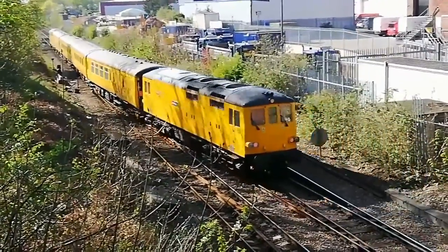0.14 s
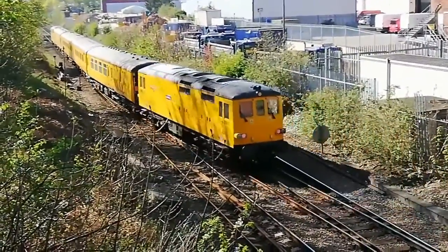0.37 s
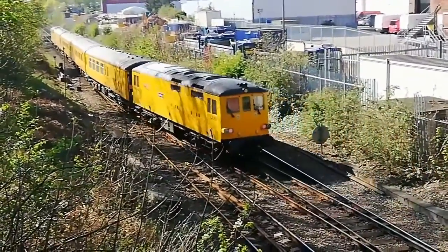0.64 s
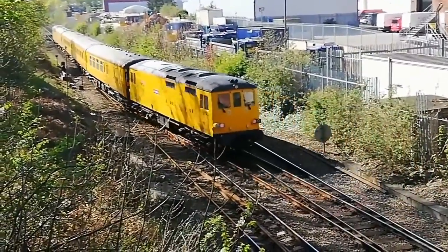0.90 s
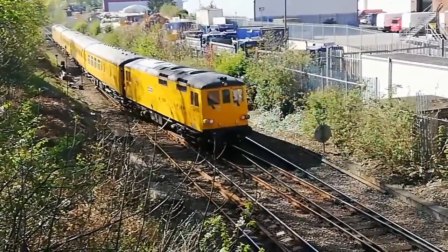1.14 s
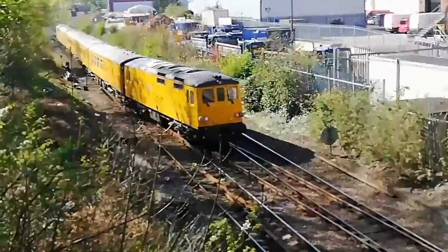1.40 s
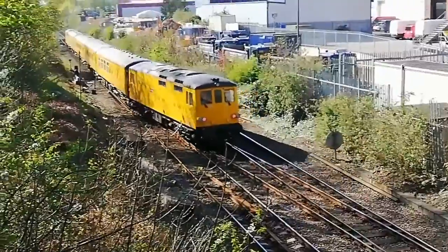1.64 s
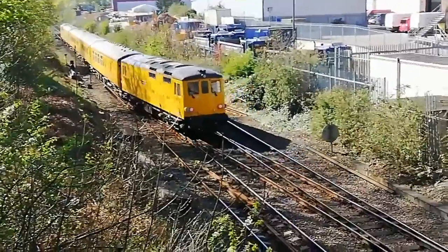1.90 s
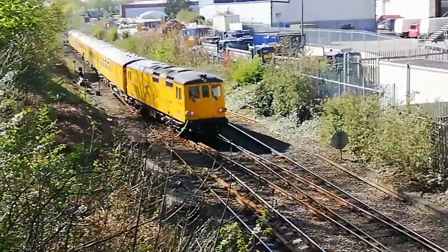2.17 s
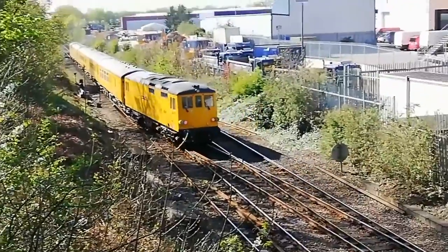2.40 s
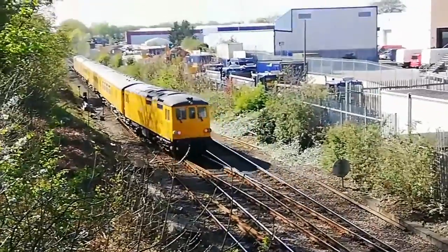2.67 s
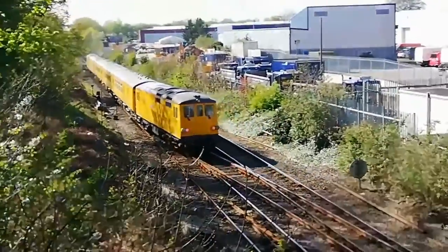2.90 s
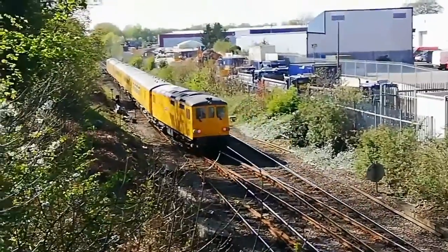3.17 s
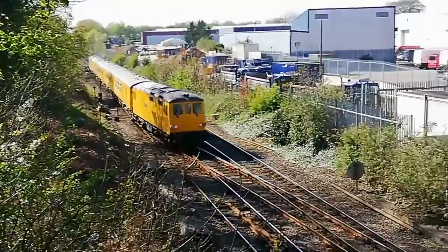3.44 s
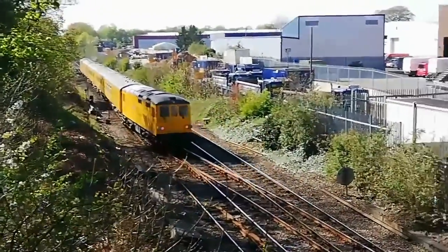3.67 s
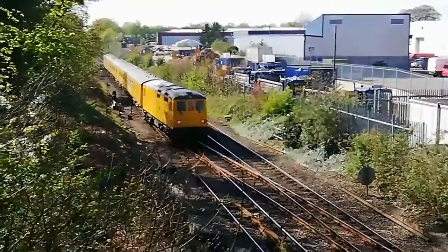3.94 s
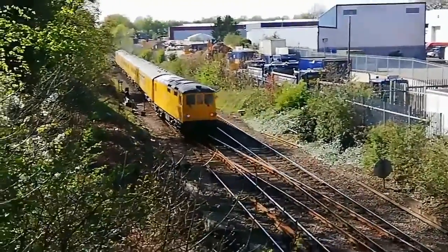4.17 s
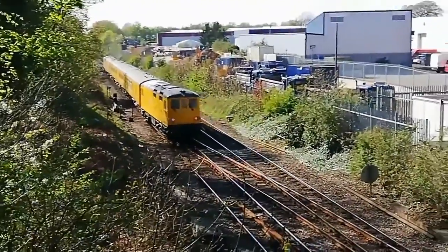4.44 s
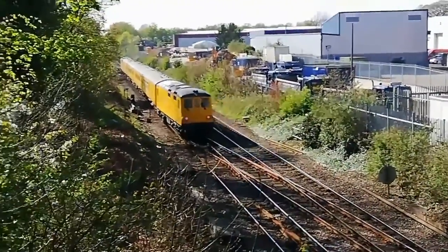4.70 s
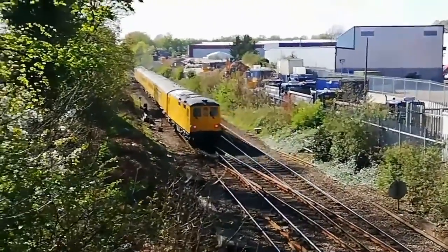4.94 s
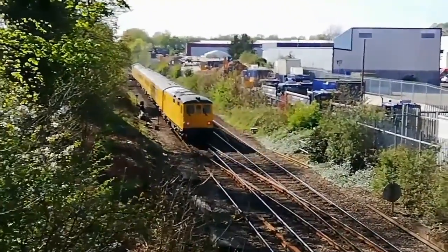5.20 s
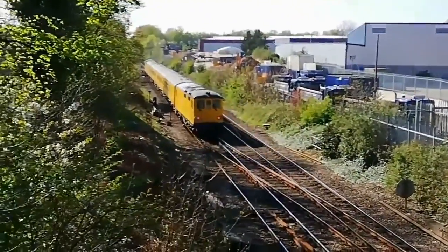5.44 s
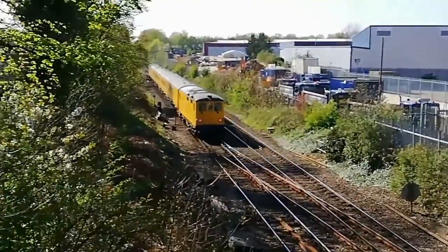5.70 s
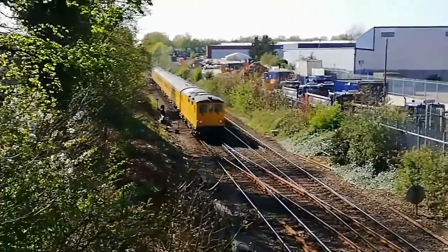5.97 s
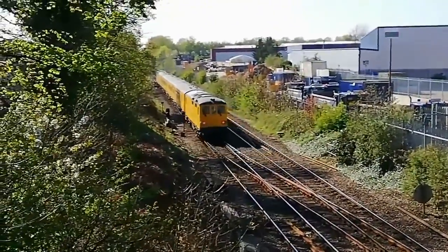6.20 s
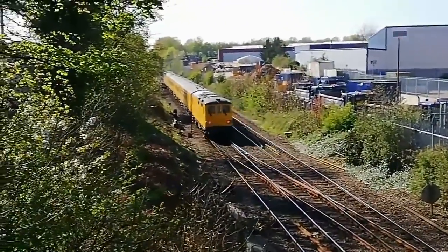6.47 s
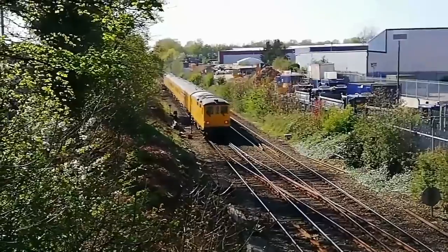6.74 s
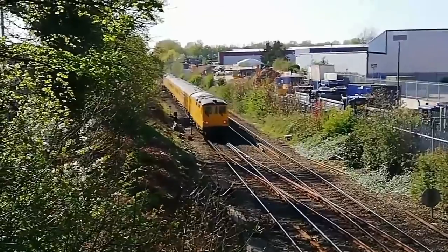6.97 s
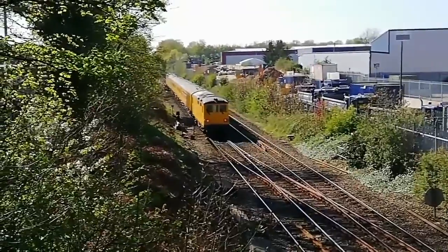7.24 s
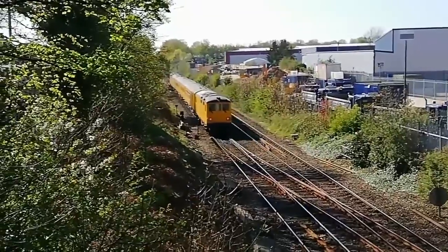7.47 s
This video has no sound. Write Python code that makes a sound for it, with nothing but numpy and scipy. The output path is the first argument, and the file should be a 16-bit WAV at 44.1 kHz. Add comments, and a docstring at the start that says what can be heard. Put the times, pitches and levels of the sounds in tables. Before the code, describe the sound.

A train draws away from a trackside bank. Strong low engine drone rises in pitch over the first second or two, throbbing, while bright metallic grinding bursts hit at the start and around half a second and one second. A sharp clack follows near two and a half seconds, then distant rolling, airy hiss and sparse close clicks, heard in open-air stereo with no strong echo.

```python
"""Beside the railway at an industrial estate, a train with two diesel engines sets off and draws away.
The engines rev up side by side as two sets of cosine tones, whose exhaust notes beat.
Wheels grind through the points as bursts of noise heard through ringing steel; flanges squeal faintly
as sliding tones with a blurred pitch, and small damped rings tick near the microphones.
Under it all, coloured bands of rolling noise thin out with distance."""
import sys
import numpy as np
from scipy import signal
from scipy.fft import rfft, irfft, next_fast_len
from scipy.io import wavfile
from scipy.ndimage import uniform_filter1d, map_coordinates

SR = 44100
rng = np.random.default_rng(int(sys.argv[2]) if len(sys.argv) > 2 else 0)


def file_out(sig):
    """Save sig as 16-bit WAV at sys.argv[1]."""
    # one column per channel
    cols = np.atleast_2d(sig).T
    # limit, then scale
    lim = np.clip(cols, -1, 1)
    pcm = np.round(lim * 32767).astype(np.int16)
    wavfile.write(sys.argv[1], SR, pcm)


def level_to_linear(level):
    """Convert decibel levels to linear amplitude factors, elementwise."""
    exponent = np.asarray(level, float) / 20
    return 10 ** exponent


N = 335601
TIME = np.arange(N) / SR  # seconds

# Exhaust notes, fading with distance and dipping where echoes cancel them.
# Each row: time in seconds, near engine's firing note in dB, far engine's firing note in dB.
EXHAUST_NOTES = [(0.0, -20.5, -34), (0.2, -19.5, -23), (0.4, -19, -23.5), (1.0, -18, -19), (1.2, -18, -25),
                 (1.5, -19, -23.5), (2.0, -23, -27.5), (2.2, -29.5, -29.5), (3.15, -41.5, -37),
                 (3.4, -51, -47), (3.8, -38, -52), (4.0, -37.5, -47), (4.2, -35.5, -33), (4.4, -37, -37),
                 (5.0, -39.5, -40), (5.6, -54, -38.5), (6.3, -56, -36.5), (6.95, -42.5, -41),
                 (7.2, -38, -33.5), (7.61, -41, -33.5)]
# Weaker tones of each engine's shaft, swelling as the exhausts turn past; order 3 is the firing note.
# Each row: order, level in dB, time when loudest in seconds, seconds from there to half the amplitude.
NEAR_SHAFT_ORDERS = [(1, -52, 4, 9), (2, -49, 6, 5), (4, -45, 2.2, 2), (5, -44, 2.8, 1.6), (7, -48, 2.5, 2),
                     (8, -46, 1, 1.5), (9, -39, .8, .5), (10, -53, 2.8, .8), (10, -56, 6.4, .6),
                     (14, -50, .8, .5), (15, -50, 2, .4), (17, -52, .95, .15), (18, -54, 1.9, .5),
                     (23.5, -56, .55, .4), (23.5, -56, 1.55, .3)]
FAR_SHAFT_ORDERS = [(1, -53, 4, 9), (1.5, -67, 4, 9), (2.01, -57, 4, 9), (2.495, -52, 4.5, 5.4),
                    (4.003, -45, 3, 4.9), (4.984, -47.5, 0.9, 5.2), (6.02, -35, 0.64, 0.57),
                    (6.12, -43.5, 7.44, 0.38), (7.91, -48, 0.9, 2.77), (9.06, -44, .5, 0.72),
                    (18.1, -53.5, 0.26, 0.91), (23.56, -55, 0.91, 1.6)]
# How hard the wheels roll as heard from the bank; only the change from the value at 1 s is used.
# Each row: time in seconds, level in dB.
ROLLING_FORCE = [(0.0, -38), (0.17, -47.5), (0.42, -46), (0.76, -52), (1.04, -50), (1.12, -49.5),
                 (2.8, -49), (2.94, -48.5), (3.22, -49.5), (3.54, -52), (3.94, -54), (4.13, -50.5),
                 (5.09, -55.5), (5.64, -52.5), (6.08, -53), (6.36, -56), (6.85, -55.5), (7.61, -53.5)]
# Colours of the five bands of rolling noise, from low to high; only the shape counts.
# Each row: frequency in Hz, relative level in dB.
RUMBLE_COLOUR = [(12, -33), (20, -15), (65, -11), (86, -6.5), (134, -9.5), (193, -6), (450, -25.5),
                 (580, -66), (990, -120)]
BODY_COLOUR = [(190, -9), (330, -2.5), (377, -9), (404, -2), (518, 0.5), (750, -6), (980, -39),
               (1650, -120)]
ROAR_COLOUR = [(410, -28), (700, -2), (751, -7), (963, -2), (1170, -5.5), (1400, -5.5), (1840, -8),
               (2300, -11.5), (2990, -36), (5060, -120)]
RAIL_HISS_COLOUR = [(1350, -10), (2300, 1.5), (2730, 0), (2970, -1), (3310, 1), (5200, -6.5), (6140, -9.5),
                    (7000, -13.5), (9100, -51), (15400, -120)]
FIZZ_COLOUR = [(3530, -72), (6000, 3), (6980, 1), (9530, 4.5), (10600, -2.5), (11400, -5.5), (12400, -15),
               (14800, -25), (15600, -26)]
# How those five bands behave, in the same order. Each row: base level in dB before swings and loss,
# share of the rolling swings it follows, loss in dB per second, patchiness in dB.
ROLLING_LAYERS = [(-34, 0.24, 0.91, 1.16), (-43, 0.18, 1.09, 1.4), (-45.5, 0.39, .3, 0.68),
                  (-46.5, 0.96, 0.37, 1.02), (-51.5, 1.02, 0.57, 2)]
# Beyond a bend of the bank the treble is screened off. One row: start in seconds,
# length of the change in seconds, final change of the rail hiss in dB, of the fizz in dB.
BANK_SCREEN = (6.1, 0.3, -2, -6.5)
# Wheels grinding through the points. Each row: time of the peak in seconds, level at the peak in dB,
# rise in seconds, centre in Hz, spread in octaves.
WHEEL_GRINDS = [(0.0, -25, 0.0035, 8750, .72), (0.04, -30, 0.024, 3700, 1.26),
                (0.42, -34.5, 0.011, 12400, .22), (0.464, -30, 0.024, 9000, .45),
                (0.476, -30, 0.024, 3640, 0.75), (0.54, -36, 0.024, 1320, 1.5), (0.75, -39, .018, 2540, .9),
                (0.99, -40, 0.01, 8450, .4), (1.008, -34.5, .012, 3950, .05), (1.04, -43, 0.037, 3900, .04),
                (.07, -46, 0.033, 5150, .2), (1.005, -33.5, 0.024, 4300, 0.82),
                (1.54, -41.5, 0.022, 2880, 0.73), (1.55, -41.5, 0.032, 1070, 0.23),
                (1.89, -38.5, 0.029, 2400, 1.15), (2.396, -30.5, .002, 3360, 0.78),
                (2.41, -37, 0.0091, 900, 1.1), (2.445, -40.5, 0.016, 3080, 0.73),
                (2.485, -45, .005, 2980, .7), (3.04, -39, 0.015, 3220, .8),
                (4.001, -46.5, 0.037, 9000, 0.52), (4.12, -53, 0.043, 9400, .43),
                (4.266, -42, 0.0072, 4170, 0.55), (6.111, -53.5, .011, 3500, .74),
                (6.66, -61, 0.034, 10500, .26), (7.269, -52, 0.019, 3000, 1.4)]
# What wheel and rail ring with. Each row: frequency in Hz, width in Hz, level over a flat floor in dB.
STEEL_RINGS = [(750, 140, 11), (1470, 60, 12.5), (2084, 106, 10), (3010, 54, 0), (3900, 760, 1.5),
               (9750, 690, 4), (10900, 300, -1)]
# Squeals of flange on rail.
# Each row: start in seconds, end in seconds, first pitch in Hz, last pitch in Hz, level in dB.
FLANGE_SQUEALS = [(0, .07, 810, 815, -43), (.47, .6, 735, 752, -41), (.47, .6, 1475, 1497, -40),
                  (.48, .57, 2960, 3000, -46), (2.68, 2.97, 3000, 2620, -48.5),
                  (2.93, 3.01, 2480, 2530, -45), (3.03, 3.15, 2600, 2680, -46.5),
                  (5.55, 6.3, 2760, 2760, -60)]
# Broad bands of hiss that come and go, the last a far rush.
# Each row: start in seconds, end in seconds, centre in Hz, blur in Hz, level in dB.
HISS_BANDS = [(2.4, 3.2, 1900, 900, -53), (.32, .46, 6050, 600, -55), (2.1, 2.35, 11400, 1200, -65),
              (2.74, 3.17, 11300, 900, -61), (4.3, 6.1, 6050, 350, -68), (5.2, 5.55, 9350, 500, -67),
              (5.25, 5.52, 11200, 500, -66), (5.6, 6.2, 9600, 900, -68), (6.2, 9.4, 1880, 550, -54)]
# Dry ticks. Each row: start in seconds, peak of the ring in dB, pitch in Hz,
# time to die by 60 dB in seconds, left minus right in dB.
DRY_TICKS = [(1.958, -26.5, 5900, 0.0017, -8), (1.9575, -33.5, 10700, 0.0036, -3),
             (2.3955, -34, 3300, .01, -2), (2.946, -37, 11500, .006, -4), (3.3066, -33, 1700, .008, 0),
             (3.3115, -26.5, 9800, 0.0066, -8), (3.312, -29.5, 1800, .004, 0),
             (3.312, -32, 3500, 0.0017, 7), (3.3185, -32, 9500, .008, 0), (3.3182, -30.5, 7100, 0.005, -4),
             (3.833, -31.5, 3230, 0.019, -1), (3.8318, -37, 2620, 0.021, -19), (4.187, -43, 7700, .012, 0),
             (5.29, -49, 11000, .006, 0), (6.349, -32, 800, .005, -8), (6.349, -38, 1600, .004, -8),
             (7.197, -44, 8240, 0.0091, 13), (7.2005, -44, 9900, 0.0074, 9), (7.206, -43, 10100, 0.011, 17),
             (7.2555, -45, 10900, .010, 16), (7.2555, -44, 4000, .006, 0), (7.273, -50, 10300, .01, 0),
             (7.285, -55, 10300, .008, 0)]
# How alike noise is left and right. Each row: frequency in Hz, likeness (1 is identical).
LIKENESS = [(60, .995), (250, .97), (450, .55), (700, .1), (1100, .32), (1900, .58), (2500, .3),
            (3100, .57), (4500, .27), (7000, .12), (15000, .12)]
# How the level leans to one side. Each row: frequency in Hz, left minus right in dB.
LEVEL_LEAN = [(150, 0), (380, -2), (550, -5.5), (800, -4), (1290, -2.5), (2380, -1.5), (4400, -2.5),
              (8120, -1), (12500, -3.5)]
# How far left runs behind right. Each row: frequency in Hz, lag in radians.
LEFT_LAG = [(25, .07), (150, .12), (450, 1.1), (650, .6), (900, -1.2), (1500, -.3), (2000, 0)]
# Dip of the microphone housing. One row: centre in Hz, width in Hz, depth in dB.
HOUSING_DIP = (2370, 220, -3.5)
# Each engine revs up at a steady rate and eases into its governed speed, which creeps.
# One row each: governed firing rate at time 0 in Hz, climb in Hz per second, time reached in seconds,
# easing in seconds, creep in Hz per second.
NEAR_REV_UP = (87.86, 17.472, 1.5642, .2722, .1777)
FAR_REV_UP = (73.6105, 18.399, .8811, .4118, .0121)


def unit(x):
    """Scaled to an rms of 1."""
    return x / np.sqrt(np.mean(np.abs(x) ** 2) + 1e-20)


def along(points, hz):
    """Values read off (Hz, value) points, joined by straight lines on a log frequency axis."""
    point_hz, values = np.transpose(points)
    return np.interp(np.log(hz + 1), np.log(point_hz + 1), values)


def curves(rows):
    """One value per sample for each column after the time."""
    times, *columns = np.transpose(rows)
    return [np.interp(TIME, times, column) for column in columns]


def wobble(rate, n=N):
    """A smooth random curve through `rate` random points a second."""
    points = rng.standard_normal(int(n * rate / SR) + 4)
    return map_coordinates(points, [np.arange(n) * rate / SR])


def pair(gain, n=N):
    """Stereo noise of rms 1 with a given colour, as alike left and right as the open air makes it."""
    m = next_fast_len(n)
    hz = np.fft.rfftfreq(m, 1 / SR)
    # the share of middle to side sound sets the likeness
    turn = np.arccos(np.clip(along(LIKENESS, hz), -1, 1)) / 2
    spectrum = rfft(rng.standard_normal((2, m))) * gain(hz)
    mid, side = irfft(spectrum * [np.cos(turn), np.sin(turn)], m)[:, :n]
    return unit(np.array([mid + side, mid - side]))


def patchy(x, patchy_db):
    """Random patches of gain over time and frequency, the same left and right."""
    z = signal.stft(x, nperseg=512)[2]
    field = uniform_filter1d(rng.standard_normal(z.shape[1:]), size=6, axis=0)  # over frequency
    field = uniform_filter1d(field, size=12, axis=1)  # over time
    return unit(signal.istft(z * level_to_linear(patchy_db * unit(field)), nperseg=512)[1][:, :N])


def rolling():
    """Five bands of wheel, body and air noise swing with the rolling and fade, each at its own rate."""
    roll_db, = curves(ROLLING_FORCE)
    swing_db = roll_db - roll_db[SR]
    shared = wobble(8.5)
    colours = (RUMBLE_COLOUR, BODY_COLOUR, ROAR_COLOUR, RAIL_HISS_COLOUR, FIZZ_COLOUR)
    bands = []
    for (db, share, loss, patchy_db), colour in zip(ROLLING_LAYERS, colours):
        level_db = db + share * swing_db - loss * TIME + 1.32 * shared
        noise = pair(lambda hz: level_to_linear(along(colour, hz)))
        bands.append(level_to_linear(level_db) * patchy(noise, patchy_db))
    start, over, *screen_db = BANK_SCREEN
    screened = np.clip((TIME - start) / over, 0, 1)
    treble = sum(level_to_linear(db * screened) * band for db, band in zip(screen_db, bands[3:]))
    return sum(bands[:3]) + treble


def ticks():
    """A tick is one quickly damped ring set off by a broad snap."""
    out = np.zeros((2, N + SR))
    t = np.arange(SR // 20) / SR
    for start, db, hz, t60, lead_db in DRY_TICKS:
        tone = np.sin(2 * np.pi * hz * t + .5 * wobble(2800, len(t)))
        ring = tone * level_to_linear(-60 * t / t60) * (1 - np.exp(-t / 0.00037))  # soft onset
        ring /= np.max(np.abs(ring))
        snap = .4 * uniform_filter1d(rng.standard_normal(len(t)), size=3) * level_to_linear(-60 * t / .004)
        sides_db = db + np.array([[.5], [-.5]]) * lead_db
        out[:, round(start * SR):][:, :len(t)] += level_to_linear(sides_db) * (ring + snap)
    return out[:, :N]


def blurred_tone(start, end, from_hz, to_hz, db, blur_hz):
    """A sliding tone that breaks up; its wandering phase blurs it, to half of blur_hz at half power."""
    n = round((end - start) * SR)
    wander = np.cumsum(rng.standard_normal((2, n)), axis=1) * np.sqrt(np.pi * blur_hz / SR)
    slide = 2 * np.pi * np.cumsum(np.linspace(from_hz, to_hz, n)) / SR
    # a sine's peak is 3 dB above its rms
    broken = level_to_linear(db + 3 + 2.5 * wobble(40, n)) * signal.windows.tukey(n, .6)
    left, other = np.sin(slide + uniform_filter1d(wander, size=12))
    return broken * [left, .6 * left + .8 * other]  # the right is partly like the left


def squeals():
    """Flange squeals slide in pitch; the bands of hiss are tones blurred until they rush."""
    out = np.zeros((2, N + 2 * SR))
    rows = []
    for start, end, from_hz, to_hz, db in FLANGE_SQUEALS:
        blur_hz = 12 + 13 * (from_hz / 1000) ** 2  # grows with the square of the pitch
        rows.append((start, end, from_hz, to_hz, db, blur_hz))
    for start, end, hz, blur_hz, db in HISS_BANDS:
        rows.append((start, end, hz, hz, db, blur_hz))
    for row in rows:
        tone = blurred_tone(*row)
        out[:, round(row[0] * SR):][:, :tone.shape[1]] += tone
    return out[:, :N]


def steel(hz):
    """Gain of the wheel and rail resonances, their power added to a flat response."""
    rings = sum(level_to_linear(2 * db) / (1 + (2 * (hz - centre) / width) ** 2) for centre, width, db in STEEL_RINGS)
    return np.sqrt(1 + rings)


def grinds():
    """Each grind swells, then dies away; it is rough noise heard through the steel."""
    out, n = np.zeros((2, N + 2 * SR)), SR
    t = np.arange(n) / SR - .1  # each peak comes 0.1 s into its burst
    for peak, db, rise, centre_hz, spread in WHEEL_GRINDS:
        def colour(hz):
            octaves = np.log2((hz + 1) / centre_hz)
            return steel(hz) * np.exp(-.5 * (octaves / spread) ** 2)

        noise = pair(colour, n)
        t60 = 0.13 + 9 * abs(rise)  # seconds; the slower a grind swells, the longer it lasts
        swell = np.exp(-.5 * (t / abs(rise)) ** 2)
        shape = np.where(t < 0, swell, level_to_linear(-60 * np.abs(t) / t60))
        out[:, round(peak * SR):][:, :n] += level_to_linear(db + 2.36 * wobble(67.0, n)) * shape * noise
    return out[:, SR // 10:][:, :N]  # takes off the 0.1 s lead


def revs(governed_hz, climb, reached, easing, creep):
    """Firing rate over time: a steady climb that bends smoothly into the governed speed."""
    short_of = climb * easing * np.log1p(np.exp((reached - TIME) / easing))
    return governed_hz + creep * TIME - short_of


def second_overtone_level(near_hz):
    """The near engine's tone at twice its firing rate fades, and is lifted as it passes the pipe's resonance."""
    pipe_hz, pipe_width_hz, pipe_db = 146.6, 9.5, 12
    lift_db = pipe_db * np.exp(-((2 * near_hz - pipe_hz) / pipe_width_hz) ** 2)
    fading = level_to_linear(-30.5 - 7 * TIME + lift_db)  # loses 7 dB per second
    far_away = level_to_linear(-47.5 + 4.8 * wobble(3.11))
    return fading + far_away


def engines():
    """Each exhaust sings its firing note; uneven cylinders add wavering shaft orders."""
    near_hz, far_hz = revs(*NEAR_REV_UP), revs(*FAR_REV_UP)
    near, far = (2 * np.pi * np.cumsum(hz) / SR for hz in (near_hz, far_hz))  # phases in radians
    near_db, far_db = curves(EXHAUST_NOTES)
    # both engines start in step, so their beat speeds up as one outruns the other
    notes = -level_to_linear(near_db) * np.cos(near) - level_to_linear(far_db) * np.cos(far)
    notes += second_overtone_level(near_hz) * np.cos(2 * near)
    notes *= level_to_linear(.5 * wobble(10))
    for firing, orders in ((near, NEAR_SHAFT_ORDERS), (far, FAR_SHAFT_ORDERS)):
        for order, db, peak, span in orders:
            swell = 1 / (1 + ((TIME - peak) / span) ** 4)
            level = level_to_linear(db + 4 * wobble(3 + .3 * order)) * swell
            waver = .8 * wobble(2.5 + .35 * order)
            notes += level * np.cos(order * firing / 3 + waver)
    return np.sqrt(2) * notes  # makes the tables' levels rms levels


def scene():
    """Everything that reaches the two microphones."""
    return rolling() + ticks() + squeals() + grinds() + engines()


def top_cut(x):
    """Nothing passes above the cut-off."""
    return signal.sosfilt(signal.butter(12, 15710, fs=SR, output="sos"), x)


def record(dry):
    """The housing shades the two microphones differently and dips one band; each hisses faintly."""
    m = next_fast_len(N + 8192)
    hz = np.fft.rfftfreq(m, 1 / SR)
    dip_hz, width_hz, depth_db = HOUSING_DIP
    dip = level_to_linear(depth_db * np.exp(-((hz - dip_hz) / width_hz) ** 2))
    # half of each left-right difference goes to the left, the opposite half to the right
    shade = level_to_linear(along(LEVEL_LEAN, hz) / 2) * np.exp(-.5j * along(LEFT_LAG, hz))
    colour = dip * [shade, 1 / shade]
    self_noise = level_to_linear(-68) * rng.standard_normal((2, N))
    heard = irfft(rfft(dry, m) * colour, m)[:, :N] + self_noise
    return top_cut(heard)


dry = scene()
out = record(dry)
file_out(out)
```